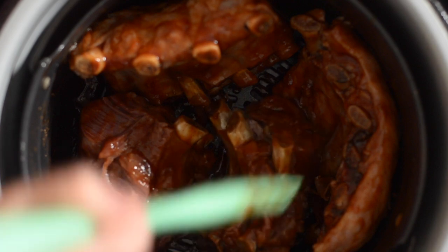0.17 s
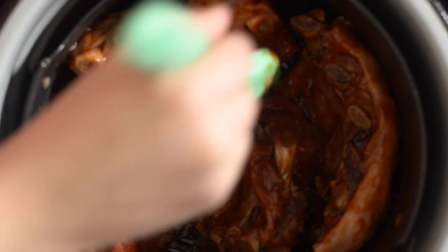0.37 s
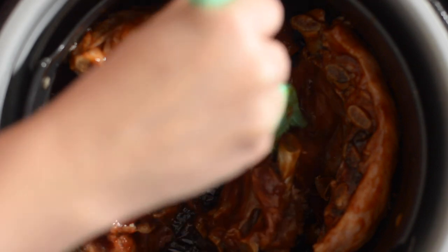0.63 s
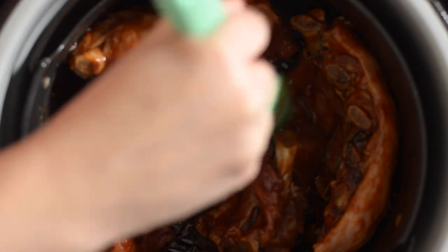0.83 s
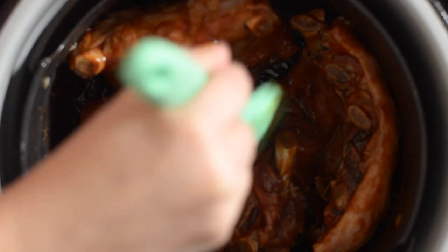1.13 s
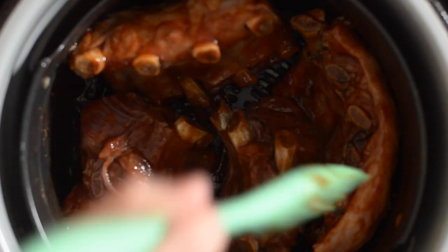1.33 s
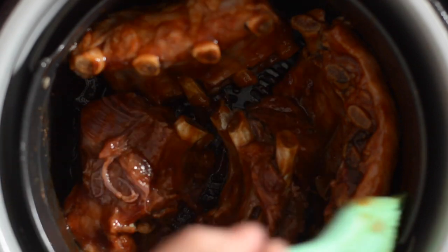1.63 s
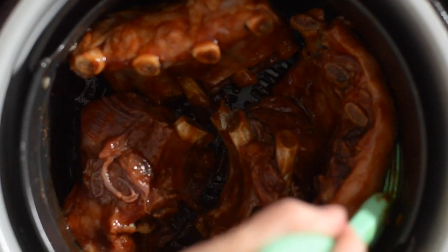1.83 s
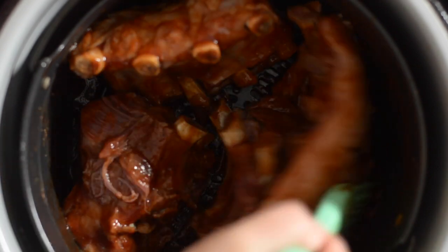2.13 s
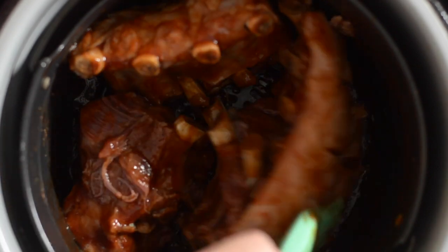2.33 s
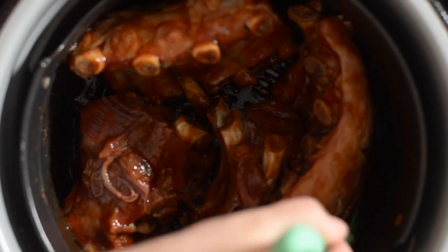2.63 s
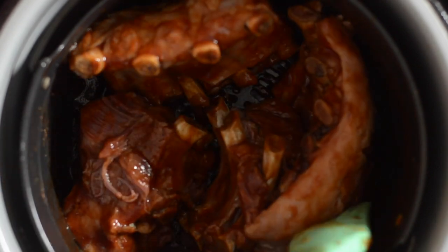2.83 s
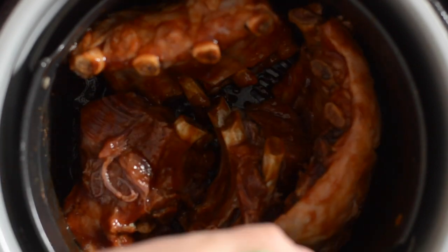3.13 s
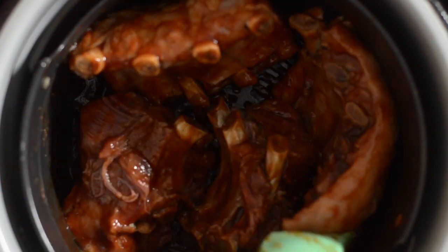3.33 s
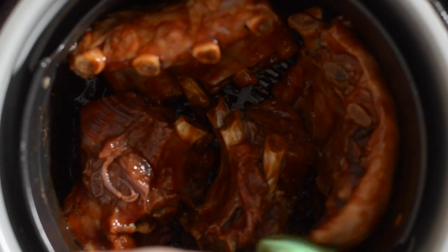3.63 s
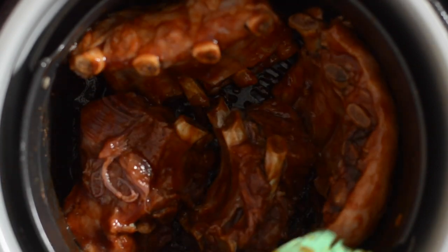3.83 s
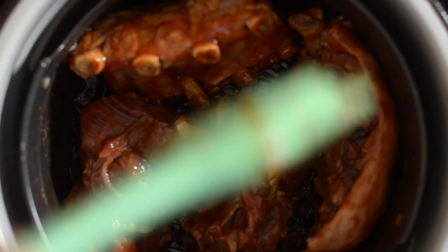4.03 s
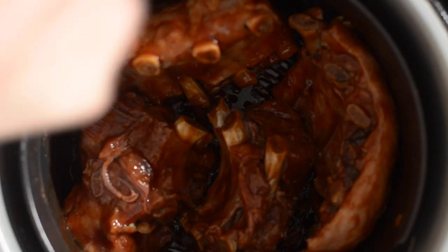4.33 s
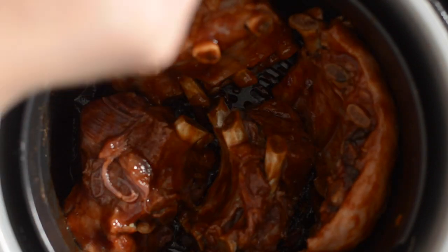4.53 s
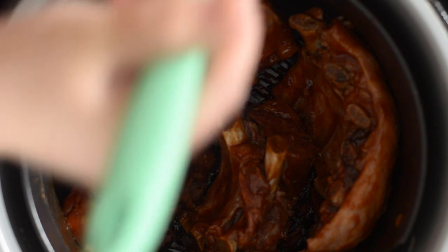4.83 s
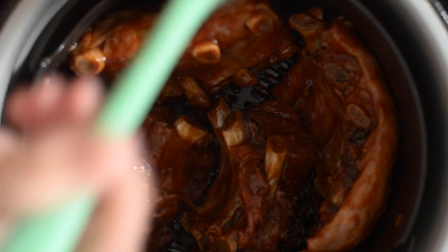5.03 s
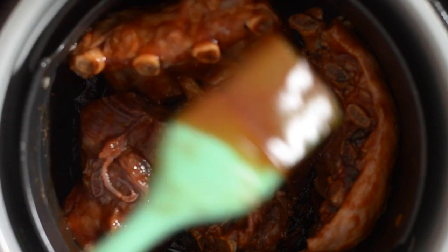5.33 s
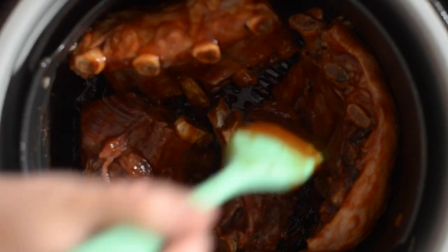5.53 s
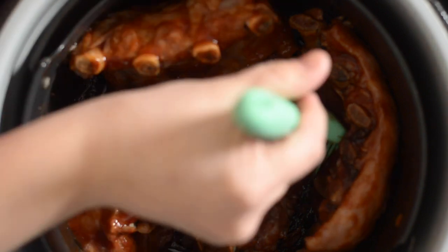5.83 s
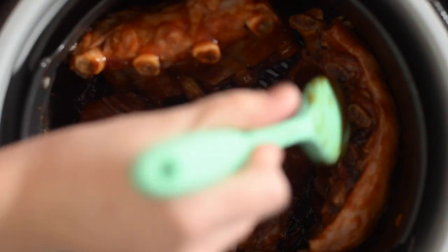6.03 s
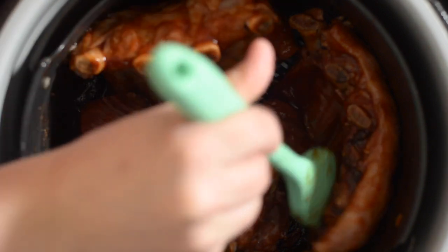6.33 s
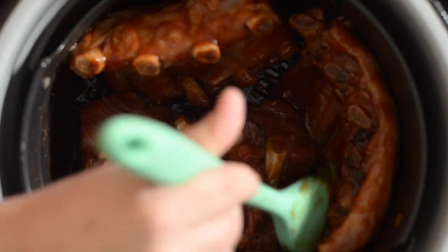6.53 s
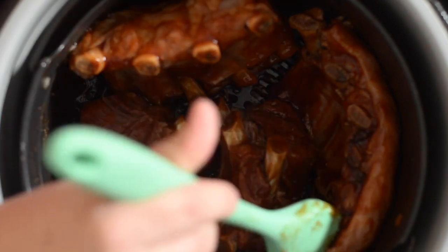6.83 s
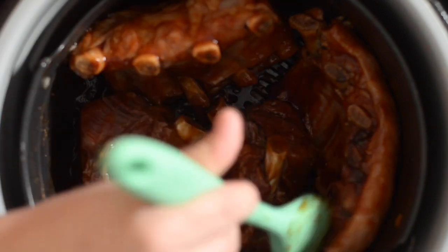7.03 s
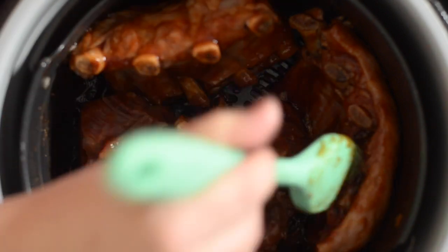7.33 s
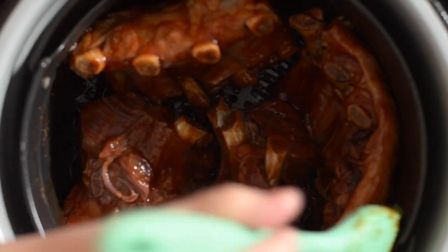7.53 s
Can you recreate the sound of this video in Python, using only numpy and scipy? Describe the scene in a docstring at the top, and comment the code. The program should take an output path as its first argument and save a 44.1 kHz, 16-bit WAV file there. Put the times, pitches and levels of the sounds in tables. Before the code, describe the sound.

A low, fluttering motor hum and a soft, dark rush of air run throughout, in a small kitchen with short reflections, heard closely in mono. Faint ticks of settling sauce sit underneath. From about 0.4 to 1.4 seconds a silicone brush makes a series of soft, sticky crackling dabs, with bristle flicks near 0.5 and 0.85 and tiny bubble pops. Two more dabs come around 1.7, then mostly hum until small touches near 3.1. At 3.4 a hollow vessel is knocked and rocks quickly: a bright crack, dull low thuds, a short ring and a rough fading wash. Faint dabs follow at 4.1 and 4.4, a light hard clack at 5.0, and a weak stroke at 5.3. A long faint stroke and wet pop come near 5.9, then brighter, busier dabs, flicks and pops from 6.3 to 7.1, with further strokes at 7.3 and the end.

```python
"""A throbbing motor hum and a rush of air open in a small kitchen, with faint ticks of settling sauce.
Over them a silicone brush spreads sauce over ribs in a cooker pot: each stroke is a cloud of tiny damped rings.
Bristles flick as pitched ticks of noise, and sauce bubbles pop as short runs of rings.
Midway a hollow vessel is knocked and rocks: ringing modes, dull thuds, a bright crack and a rough wash.
Later something hard clacks lightly: a short coloured noise burst with a tail."""
import sys
import numpy as np
from scipy import signal
from scipy.fft import rfft, irfft
from scipy.io import wavfile
from scipy.ndimage import uniform_filter1d

SR = 44100
rng = np.random.default_rng(int(sys.argv[2]) if len(sys.argv) > 2 else 0)


def store_pcm(level_fs):
    """Save levels as 16-bit WAV."""
    pcm = np.round(np.clip(level_fs, -1, 1) * 32767).astype(np.int16)
    wavfile.write(sys.argv[1], SR, np.atleast_2d(pcm).T)


N = 338688  # samples


def undb(db):
    """Decibels to gain."""
    return 10 ** (np.asarray(db) / 20)


def unit(x):
    """Scale to rms 1."""
    return x / np.sqrt(np.mean(x ** 2))


def add(out, start_s, x):
    """Mix x into out from start_s on."""
    i = max(int(start_s * SR), 0)
    part = out[i:i + len(x)]
    part += x[:len(part)]


def fade(t, t60):
    """Exponential decay, 60 dB down after t60 seconds."""
    return undb(-60 * t / t60)


def colour(x, points):
    """Filter by a spectrum of (f/Hz, level/dB) points, joined along log frequency."""
    hz, db = np.transpose(points)
    f = np.maximum(np.arange(len(x) // 2 + 1) * SR / len(x), 1)
    gain = undb(np.interp(np.log(f), np.log(hz), db))
    return irfft(rfft(x) * gain, len(x))


def low_cut(x, hz):
    """Second-order high-pass: thins out what lies below hz."""
    return signal.sosfilt(signal.butter(2, hz, "high", fs=SR, output="sos"), x)


def walk(rate):
    """Smooth random drift of rms near 1, from about rate random values a second."""
    k = int(SR / rate)
    steps = np.repeat(rng.standard_normal(N // k + 1), k)
    smooth = uniform_filter1d(uniform_filter1d(steps, k), k)
    return unit(smooth)[:N]


def burst(t60):
    """Noise that starts at once and dies away, cut off after half a second."""
    t = np.arange(SR // 2) / SR
    return rng.standard_normal(len(t)) * fade(t, t60)


def contact(t60, tail_db, tail_t60):
    """A sharp crack of noise and its dense tail of reflections."""
    return burst(t60) + undb(tail_db) * burst(tail_t60)


def grains(times, hz, size, cycles):
    """A cloud of tiny damped rings, each falling 60 dB in the given number of cycles."""
    t = np.arange(SR // 100) / SR  # each ring is cut at 10 ms
    hz = np.clip(hz, 300, SR / 3)[:, None]
    # the root of the pitch offsets the shorter life of high rings
    rings = size[:, None] * np.sqrt(hz) * np.sin(2 * np.pi * hz * t) * fade(t, cycles / hz)
    places = (times * SR).astype(int)[:, None] + np.arange(len(t))
    return np.bincount(places.ravel(), rings.ravel())


def lasting(x, length, db):
    """Give x the energy of a sound that holds level db for length seconds."""
    return x * undb(db) * np.sqrt(length * SR / np.sum(x ** 2))


def kitchen(x, pot_db, room_db, pot_t60=0.12, room_t60=0.48, room_swell_s=0.019):
    """Direct sound, quick reflections around the pot and the longer ring of the room."""
    t = np.arange(SR // 2) / SR
    near, far = rng.standard_normal((2, len(t)))
    near = near * fade(t, pot_t60)
    far = colour(far, [(100, 5.5), (4000, 0.0), (15000, -3.0)])
    far = far * fade(t, room_t60) * (1 - np.exp(-t / room_swell_s))
    echo = undb(pot_db) * near / np.linalg.norm(near) + undb(room_db) * far / np.linalg.norm(far)
    echo[0] += 1  # direct sound
    return signal.fftconvolve(x, echo / np.linalg.norm(echo))[:N]


# motor tones, levels before the flutter: (f/Hz, level/dB rms, unsteadiness 0-1)
MOTOR_TONES = [(120, -82.5, 1), (178.2, -70.5, 0.92), (222, -64.5, 1), (235, -68, 0.78), (263, -68, 0.98),
               (412, -80, 0.8), (478.3, -67, 1), (530.6, -62.5, 0.88), (710, -73.5, 0.87), (1146, -76.5, 1),
               (1486, -81, 1), (1599, -71, .8), (2014, -78.5, .8), (4720, -75.5, 0.7), (9997, -83.5, 0.2)]
# how far the fan's tone lies below the mains overtone: (t/s, slip f/Hz)
FAN_TONE_SLIP = [(0.0, 7.2), (0.32, 5.99), (1.6, 7.24), (1.92, 6.14), (3.52, 7.16), (3.84, 5.83),
                 (4.8, 6.52), (6.4, 6.17), (6.72, 6.82), (7.68, 6.54)]
# uneven swells of the fan's tone, before the flutter: (t/s, level/dB rms)
FAN_TONE_LEVEL = [(0.0, -45), (0.12, -47.5), (0.58, -51), (0.66, -45.5), (1.06, -46.5), (1.18, -49),
                  (1.5, -47), (1.58, -50.1), (1.8, -43), (2.02, -50), (2.16, -45.8), (2.24, -45),
                  (2.32, -51), (2.48, -47), (2.8, -51.3), (3.14, -42), (3.24, -50.5), (3.78, -47.0),
                  (3.86, -50.5), (3.98, -50.5), (4.1, -43.5), (4.22, -49.5), (4.4, -45.5), (4.54, -49.7),
                  (4.74, -47.3), (4.84, -49), (5.08, -46.5), (5.26, -51), (5.34, -45.5), (5.46, -53),
                  (5.54, -45), (5.72, -55), (5.82, -50), (6.14, -46.5), (6.2, -51), (6.34, -44),
                  (6.52, -54), (6.64, -44.5), (6.78, -49.5), (6.9, -47.8), (7.0, -52), (7.08, -48.5),
                  (7.4, -49.0), (7.66, -46)]


def motor(overtone_hz=359.9, overtone_db=-61.5, wander_rad=1.28, flutter_db=4.5,
          fan_wander_rad=0.37, fan_flutter_db=1.5):
    """The fan's tone beats against an overtone of the mains; other motor tones waver around them."""
    t = np.arange(N) / SR
    fan_hz = overtone_hz - np.interp(t, *np.transpose(FAN_TONE_SLIP))
    fan_gain = undb(np.interp(t, *np.transpose(FAN_TONE_LEVEL)))
    fan = fan_gain * np.exp(2j * np.pi * np.cumsum(fan_hz) / SR)
    mains = undb(overtone_db) * np.exp(2j * np.pi * overtone_hz * t)
    # the beating pair shares one flutter in level and one wander in phase
    throb = np.imag((fan + mains) * np.exp(1j * fan_wander_rad * walk(22)))
    out = undb(fan_flutter_db * walk(35)) * throb
    for hz, db, unsteady in MOTOR_TONES:
        gain = undb(db + unsteady * flutter_db * walk(22))
        phase = 2 * np.pi * hz * t + unsteady * wander_rad * walk(11)
        out += gain * np.sin(phase)
    return np.sqrt(2) * out  # rms levels to sine peaks


# colour of the moving air, relative: (f/Hz, level/dB per Hz)
AIR_COLOUR = [(30, -46), (55, -26), (100, -16), (150, -6.5), (195, -1.5), (235, 0), (370, 3), (450, -4.5),
              (750, -8), (1600, -10), (2100, -14), (2700, -18), (4900, -19), (7000, -25), (11000, -29.5),
              (15500, -37)]


def air(db=-49.5, flicker_db=-0.5):
    """The fan's rush: noise rippled by the room's resonances, its level flickering slightly."""
    rush = kitchen(rng.standard_normal(N), pot_db=-22, room_db=-16)
    return unit(colour(rush, AIR_COLOUR)) * undb(db + flicker_db * walk(12))


# what the meat and pot let out of the wet sounds; also shapes brush and bubbles: (f/Hz, level/dB)
WET_COLOUR = [(60, -38), (500, 7.5), (1000, 4.5), (2000, 0), (3000, 0), (5300, -2), (7200, -4.5),
              (10000, -3), (15000, -8)]


def seep(hz=2600, spread_octaves=0.72, scatter_db=5.0, cycles=6, db=-60.0, count=380):
    """Faint stray ticks of sauce settling on the meat: damped rings at random times."""
    pitch, size = rng.standard_normal((2, count))
    times = rng.random(count) * N / SR
    tick_hz = hz * 2 ** (spread_octaves * pitch)
    tick_gain = undb(scatter_db * np.minimum(size, 2))  # no tick stands far out
    out = np.zeros(N)
    add(out, 0, grains(times, tick_hz, tick_gain, cycles))
    return undb(db) * unit(kitchen(colour(out, WET_COLOUR), pot_db=4.0, room_db=-11.0))


# brush strokes, levels before the pot and room: (middle t/s, half-span t/s, level/dB, crackle f/Hz)
BRUSH_STROKES = [(0.461, 0.075, -51, 3300), (0.573, 0.067, -48, 2660), (0.643, 0.05, -51, 2620),
                 (0.778, 0.069, -52.5, 2200), (0.946, 0.091, -51.5, 2950), (1.088, 0.065, -54.5, 2190),
                 (1.285, 0.16, -53, 3100), (1.699, 0.064, -51.5, 1360), (1.785, 0.071, -54.5, 3000),
                 (3.042, 0.036, -52, 2450), (3.143, 0.081, -56, 1900), (4.12, 0.038, -55, 1900),
                 (4.435, .05, -57, 2400), (5.318, 0.069, -56, 3020), (5.905, 0.38, -64.5, 3880),
                 (6.306, 0.089, -50, 4040), (6.378, 0.07, -45.5, 3350), (6.528, 0.055, -47.5, 4230),
                 (6.659, 0.036, -53, 2080), (6.694, 0.077, -50.5, 3300), (6.856, 0.1, -54.5, 4020),
                 (7.008, 0.053, -48.5, 4400), (7.308, 0.042, -52, 4280), (7.599, 0.12, -50.5, 3650)]


def brush(spread_octaves=0.58, scatter_db=3.0, cycles=7, low_share=0.29, count=170):
    """Bristles peel off sticky sauce: a swell of tiny snaps of many sizes, thin far below their pitch."""
    out = np.zeros(N)
    for middle_s, half_span_s, db, hz in BRUSH_STROKES:
        times = 2 * half_span_s * rng.random((count, 4)).mean(axis=1)  # thickest in mid-stroke
        pitch, size = rng.standard_normal((2, count))
        snap_hz = hz * 2 ** (spread_octaves * pitch)
        crackle = grains(times, snap_hz, undb(scatter_db * size), cycles)
        crackle = low_cut(crackle, low_share * hz)
        add(out, middle_s - half_span_s, lasting(crackle, half_span_s, db))
    return kitchen(colour(out, WET_COLOUR), pot_db=3.5, room_db=-7)


# bristles flick against the meat: (t/s, force level/dB, pitch f/Hz)
BRISTLE_FLICKS = [(0.533, -25, 2590), (0.854, -28, 2860), (0.866, -34, 3100), (6.352, -35, 3090),
                  (6.372, -41, 3000), (6.398, -35, 2700), (6.51, -37, 2500), (7.021, -31, 2700),
                  (7.292, -41, 3080)]


def flicks(width_octaves=0.36):
    """Bent bristles spring free and slap the wet meat: a pitched tick with a short splash."""
    out = np.zeros(N)
    f = np.arange(SR // 4 + 1) * 2 + 1  # one per bin of a half-second burst, kept above zero
    for start_s, db, hz in BRISTLE_FLICKS:
        octaves_off = np.log2(f / hz)
        band = 1 / (1 + (octaves_off / width_octaves / 2) ** 2) ** 2
        slap = contact(t60=0.014, tail_db=-8.5, tail_t60=0.19)
        add(out, start_s, undb(db) * irfft(rfft(slap) * band))
    return out


# bursting sauce bubbles, levels before the pot and room: (t/s, level/dB, pitch f/Hz, spread f/Hz)
BUBBLE_POPS = [(0.633, -48, 5500, 900), (0.789, -59, 9700, 700), (1.116, -53.5, 7160, 250),
               (1.259, -50.5, 4100, 700), (1.303, -53, 4230, 600), (1.791, -52, 5600, 500),
               (3.196, -65, 9000, 500), (4.937, -51, 2600, 500), (5.318, -59, 10200, 700),
               (5.957, -47.5, 6140, 844), (6.49, -59.5, 11500, 1400), (6.532, -45, 5100, 1000),
               (6.697, -60, 13000, 500), (7.153, -54, 5100, 400), (7.292, -61, 9000, 500),
               (7.46, -63, 8600, 400), (7.515, -64, 11200, 500)]
# big, low bubbles burst nearly at once, small ones in a longer run: (pitch f/Hz, run t/s)
BUBBLE_RUN = [(3600, .003), (4700, 0.025)]


def bubbles(scatter_db=2, life_s=0.0029, ring_s=0.0076, falloff_db=-6, count=30):
    """Bubbles of like size burst one right after another, the first ones loudest on average."""
    out, order = np.zeros(N), np.arange(count) / count
    for start_s, db, hz, spread_hz in BUBBLE_POPS:
        run_s = np.interp(hz, *np.transpose(BUBBLE_RUN))
        times = run_s * (order + rng.random(count) / count)
        pitch, size = rng.standard_normal((2, count))
        gain = undb(scatter_db * size + falloff_db * order)
        cluster = grains(times, hz + spread_hz * pitch, gain, life_s * hz)
        add(out, start_s, lasting(cluster, run_s + ring_s, db))
    return kitchen(colour(out, WET_COLOUR), pot_db=3.5, room_db=-3.5)


# the vessel lands and rocks: (t/s, force on its modes level/dB, thud level/dB)
VESSEL_CONTACTS = [(3.39, -3, -15), (3.3967, 7.5, -13), (3.4072, -1.7, -25), (3.4136, -6.5, -26),
                   (3.4325, -2, -16.5), (3.4488, -1.6, -21), (3.4781, -7, -34)]
# its ringing modes, before the force: (f/Hz, level/dB, t60 t/s, swell time constant t/s)
VESSEL_MODES = [(230.4, -44.5, 0.53, 0.022), (275.5, -20, 0.11, 0.029), (303, -19.5, 0.074, 0.01),
                (358.6, -14.5, 0.13, 0.013), (380, -26, 0.34, 0.0032), (408, -23, 0.12, 0.0025),
                (450, -27.5, 0.081, 0.0053), (518.7, -25, 0.44, 0.01), (558.5, -27, 0.11, .01),
                (708, -57, 0.17, 0.0082), (773, -36.5, 0.068, 0.0022), (883, -45, 0.22, .004),
                (962, -44, 0.062, .03), (1095, -47, 0.2, .004), (1226, -36, .19, 0.045),
                (1478, -52, 0.35, .004), (1730, -43.5, 0.41, 0.024), (2120, -53, .12, .002),
                (2894, -46.5, 0.073, 0.0022), (4560, -46, 0.08, .001), (4720, -52.5, .06, 0.0011)]
# the dull body of each contact: (f/Hz, level/dB)
THUD_COLOUR = [(60, -66), (170, -40), (280, 5), (450, 5), (620, -5), (800, -6), (1200, -12.5), (2200, -39),
               (3600, -37), (4700, -29), (7000, -63), (15000, -58)]
# the rough wash that hangs on after the knock, strongest around 180-290 Hz
# and thinning upward: (f/Hz, level/dB)
WASH_COLOUR = [(80, -26), (180, 16), (290, 12.5), (900, 6), (1800, 2.5), (2400, -6), (3100, -2),
               (3900, -9.5), (4800, -5), (7000, -14.5), (11000, -22), (15000, -27)]
# the bright crack as its hard rim first touches: (f/Hz, level/dB)
CRACK_COLOUR = [(300, -30), (1500, -8), (2900, -12), (3700, -9), (4700, 5), (6500, -20), (15000, -34)]


def knock(thud_t60=0.12, wash_db=-35, wash_t60=1.0, crack_db=-31.0, lead_s=0.0014, lowest_hz=125):
    """The rim cracks down; each contact drives the vessel's modes and thuds; a rough wash hangs on."""
    rings, thuds, wash, crack = np.zeros((4, N))
    t = np.arange(SR) / SR
    ring = np.zeros(SR)
    for hz, db, t60, swell_s in VESSEL_MODES:
        envelope = fade(t, t60) * (1 - np.exp(-t / swell_s))
        ring += undb(db) * np.sin(2 * np.pi * hz * t) * envelope
    for start_s, force_db, thud_db in VESSEL_CONTACTS:
        add(rings, start_s, undb(force_db) * ring)
        add(thuds, start_s, undb(thud_db) * burst(thud_t60))
    first_s = VESSEL_CONTACTS[0][0]
    add(wash, first_s, undb(wash_db) * burst(wash_t60))
    rim = contact(t60=0.017, tail_db=-20, tail_t60=0.25)
    add(crack, first_s - lead_s, undb(crack_db) * rim)  # the rim touches just ahead
    body = rings + colour(thuds, THUD_COLOUR) + colour(wash, WASH_COLOUR) + colour(crack, CRACK_COLOUR)
    return kitchen(low_cut(body, lowest_hz), pot_db=-33, room_db=-20.5)


# light hard clack, before its colour: (t/s, force level/dB)
HARD_CLACKS = [(5.0066, -26)]
# its colour: (f/Hz, level/dB)
CLACK_COLOUR = [(100, -28), (650, 1), (1050, -4), (1450, 6.5), (2100, 2.5), (3000, -7.5), (4000, -20),
                (5150, -6), (6000, -18), (7200, -25), (9000, -23), (15000, -34)]


def clack():
    """A short hard contact: a noise burst with a strong tail of reflections, peaked in the mids."""
    out = np.zeros(N)
    for start_s, db in HARD_CLACKS:
        add(out, start_s, undb(db) * contact(t60=0.042, tail_db=-7, tail_t60=0.46))
    return colour(out, CLACK_COLOUR)


def scene():
    """Brushing, a knock and a clack over the hum and air, in mono."""
    appliance = motor() + air()
    sauce = seep() + brush() + flicks() + bubbles()
    return (appliance + sauce + knock() + clack())[None]


def record(dry):
    """The microphone thins the bass below 85 Hz and cuts the top above 15650 Hz."""
    top_cut = signal.ellip(12, 0.2, 80, 15650, fs=SR, output="sos")
    return signal.sosfilt(top_cut, low_cut(dry, 85))


dry = scene()
out = record(dry)
store_pcm(out)
```